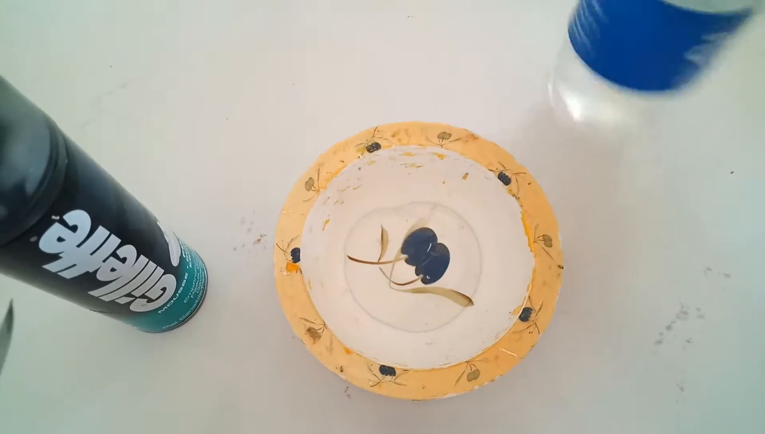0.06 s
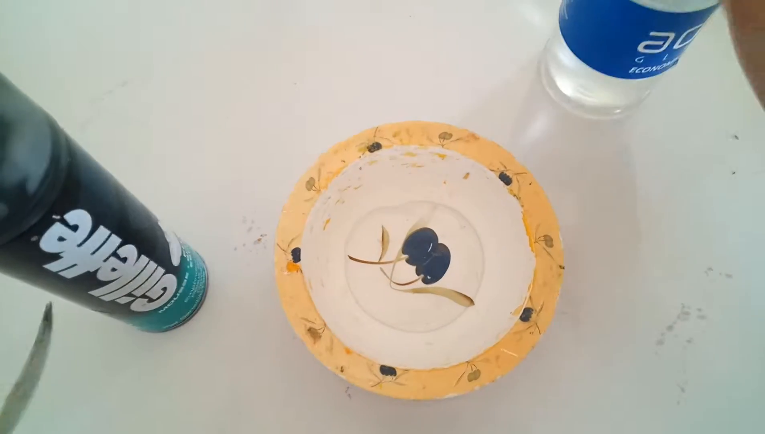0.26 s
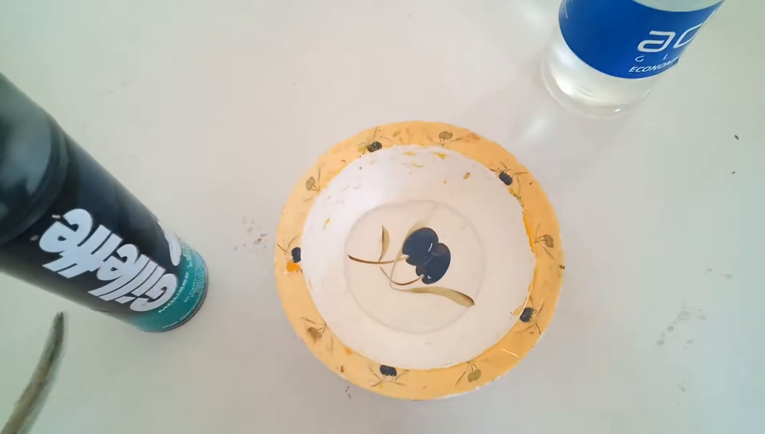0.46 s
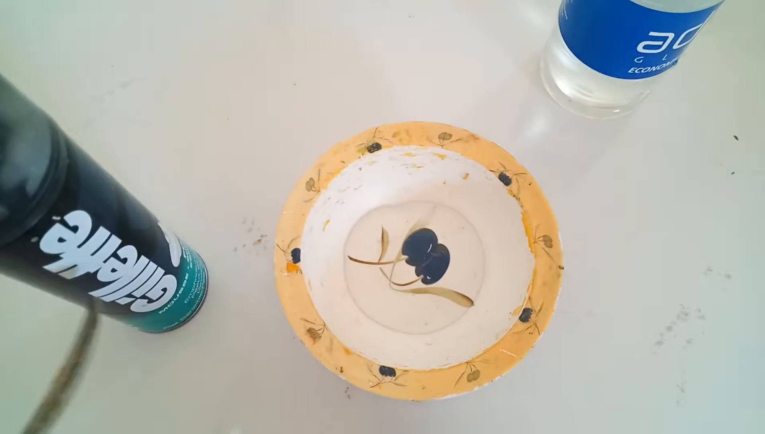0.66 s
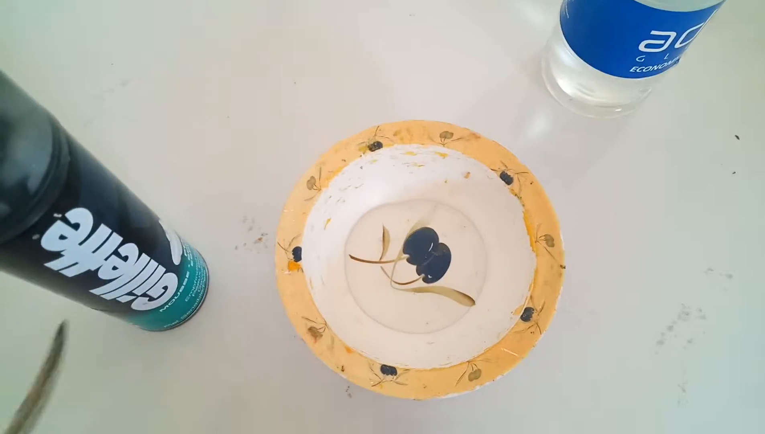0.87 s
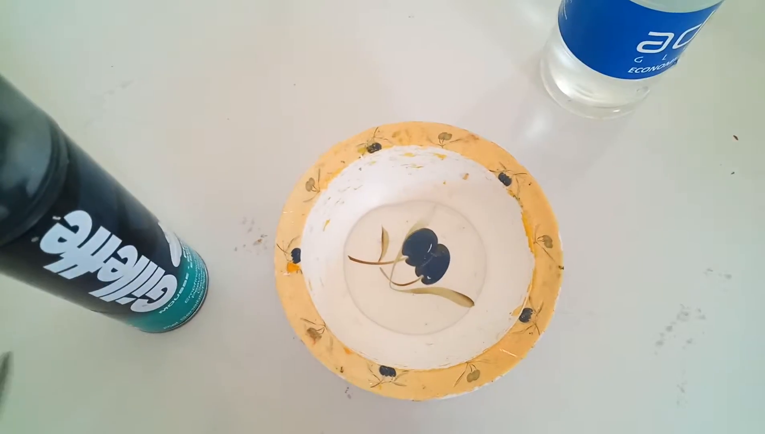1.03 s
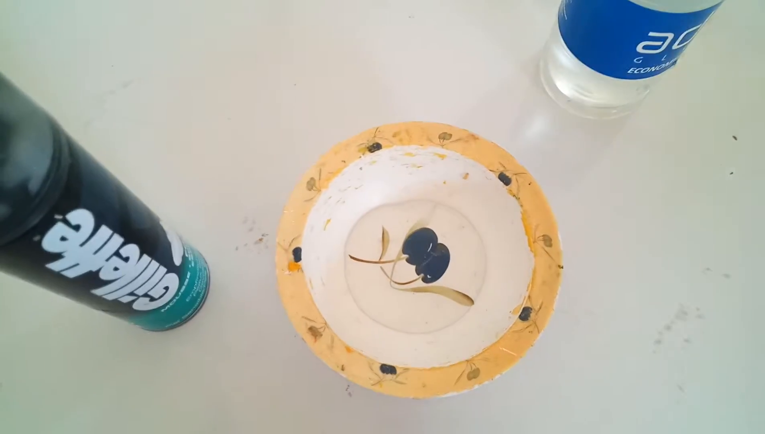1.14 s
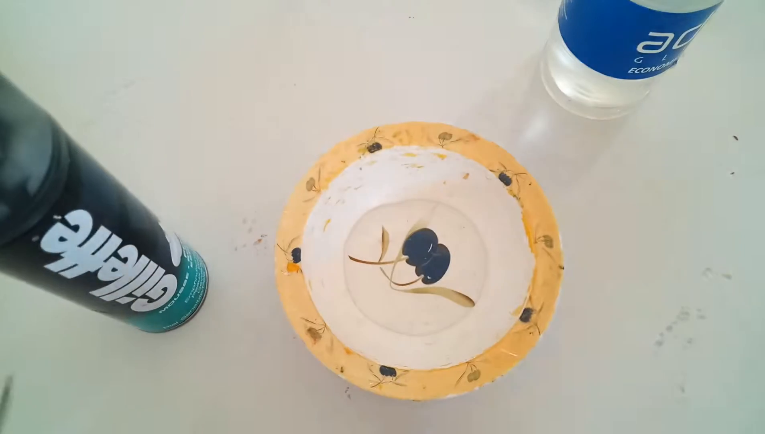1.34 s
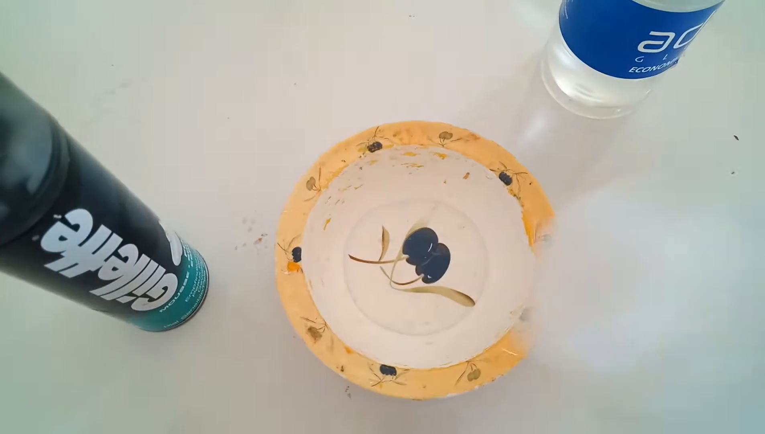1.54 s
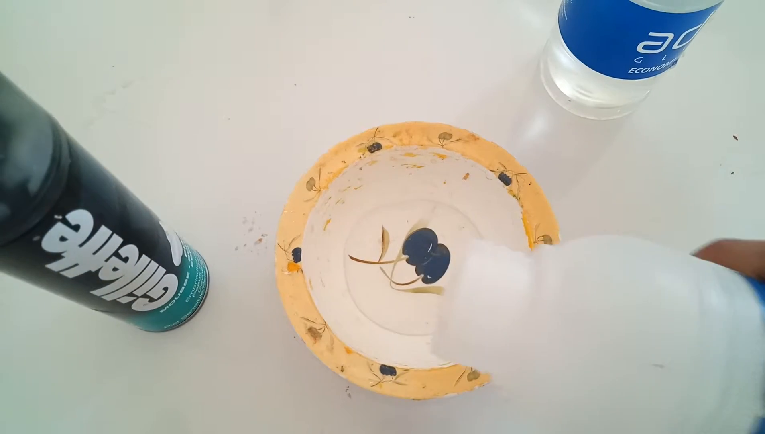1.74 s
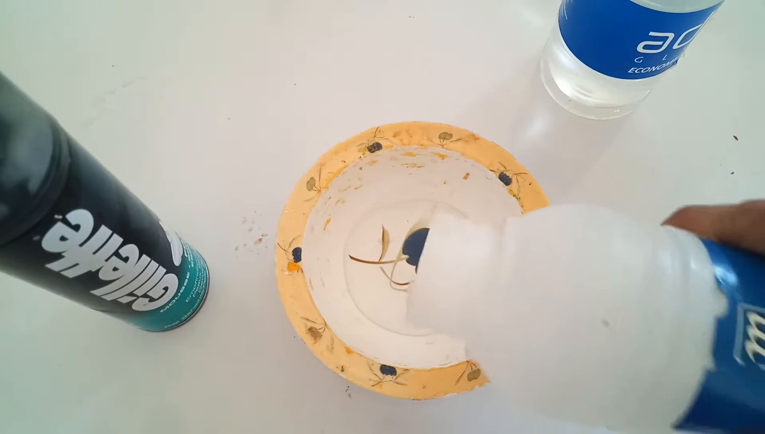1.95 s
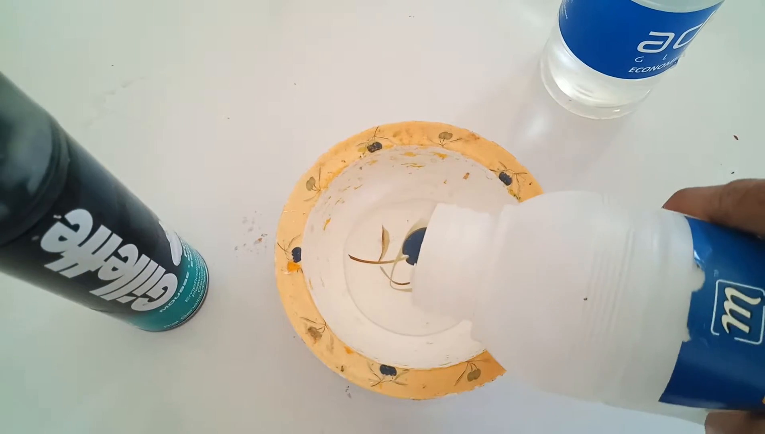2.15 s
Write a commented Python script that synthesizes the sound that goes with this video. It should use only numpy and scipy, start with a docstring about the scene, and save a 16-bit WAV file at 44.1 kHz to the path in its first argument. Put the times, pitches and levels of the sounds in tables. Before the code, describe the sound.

A plastic water bottle set down on a table with a hard, booming thud.

```python
"""A hard knock and a boom: a full plastic water bottle is set down on a table in a small, bare room.
Its base touches, lands and seats within 4 ms; bottle wall and table top ring, and the room
answers with echoes, standing waves and a tail. Soft rubs and one light tick of handling follow.
Behind them: faint thin tones, a low rumble and quiet room noise."""
import sys
import numpy as np
from scipy import signal
from scipy.fft import rfft, irfft
from scipy.io import wavfile

SR = 44100
rng = np.random.default_rng(int(sys.argv[2]) if len(sys.argv) > 2 else 0)


def put_to_file(sound):
    """Save the sound as 16-bit audio at rate SR, in the file named by the first command-line argument."""
    columns = np.atleast_2d(sound).T  # one column per channel
    safe = np.clip(columns, -1, 1)
    whole_steps = np.round(safe * 32767)
    wavfile.write(sys.argv[1], SR, whole_steps.astype(np.int16))


N = 97020
T = np.arange(N) / SR

# base touches, lands, seats: t/s, level/dB, contact time/ms
BASE_CONTACTS = [(0.2271, -20, 0.2), (0.2292, 4, 0.22), (0.2308, 6.5, 0.72)]
# resonances: f/Hz, level/dB, t60/s
BASE_MODES = [(300, -15.5, 0.017), (576, -19, 0.011), (903, -17, 0.018), (1424, -20, 0.012),
              (1744, -23, 0.022), (2916, -13, 0.015)]
WALL_MODES = [(787, -33, .26), (844, -30, .25), (900, -34, .29), (990, -31, .29), (1228, -35, .35),
              (1278, -36, .34), (1362, -34, .28), (1390, -31, .25), (1774.5, -22, .22), (1792, -29, .23),
              (2333, -39, .23), (2559, -33, .2), (2710, -32, .21), (2807, -33, .2), (4420, -39, .18),
              (10761, -42, .15)]
TABLE_MODES = [(251.7, -22, .32), (274, -22, .35), (288.5, -21, .34), (316, -36, .5), (336.5, -25, .32),
               (356, -32, .48), (411.3, -29, .39), (423, -31, .3), (467, -34, .3), (492, -36, .38),
               (510.5, -29, .38), (570, -32, .3), (591, -36, .46), (650.7, -32, .38)]
ROOM_MODES = [(68.5, -38, .7), (75, -38, .45), (95.5, -32, .52), (120.2, -22, .69), (145.2, -17.3, .64),
              (172.8, -24, .44), (197.2, -26, .45)]
TICK_MODES = [(210, 8.5, 0.19), (467, 5.5, 0.17)]
# reflections off nearby walls: delay/s, level/dB
WALL_ECHOES = [(.0045, -15), (.0115, -12), (.015, -15), (0.022, -32), (0.0243, -11.5), (.046, -23.5)]
# reverberation time: f/Hz, t60/s
TAIL_T60 = [(60, 0.76), (160, 0.85), (420, 0.65), (1100, 0.45), (2900, 0.4), (6500, 0.24), (9000, 0.21),
            (14000, .25)]
# two touches of the tick: t/s, level/dB
TICK_TOUCHES = [(0.9823, -52), (0.9867, -64.5)]
# strokes on plastic: t/s, length/s, level/dB, tilt/(dB/octave)
RUB_STROKES = [(0.473, 0.053, -64, 9), (1.076, 0.07, -70, 3), (1.124, 0.042, -66.5, 5),
               (1.449, 0.035, -62, 1), (1.465, 0.047, -53.5, -0.3), (1.574, 0.025, -64, -3.4),
               (1.876, 0.062, -80.5, -0.5)]
# thin tones: t/s, length/s, f/Hz, level/dB
THIN_TONES = [(0.707, 0.065, 1190, -65.5), (0.855, 0.14, 1182, -69), (1.881, .09, 3070, -80),
              (2.055, 0.071, 4460, -85.5)]
# noise colours: f/Hz, relative density/dB
CRACK_SPECTRUM = [(60, -25), (200, -15.5), (900, 4), (3200, 1), (4400, -2), (5400, -24.5), (7300, -13.5),
                  (10000, -19), (15000, -30)]
TAIL_SPECTRUM = [(30, -26.5), (55, -25.5), (75, -14), (130, -8.5), (300, -0.5), (550, -10.5), (720, -7),
                 (900, -5.5), (1120, -11.5), (1400, -8.5), (1750, -8), (2130, -16.5), (2800, -11),
                 (4300, -18), (5300, -29), (7000, -28.5), (10000, -45), (15000, -50.5)]
LATE_TAIL_SPECTRUM = [(40, -19), (120, -5), (400, -0.5), (1200, 1), (3800, -6), (5300, -22), (7000, -26),
                      (9000, -34), (15000, -36)]
TICK_SPECTRUM = [(150, 1), (500, 9), (1000, -7), (1900, 6), (3500, -4), (5000, -16), (7000, -15),
                 (12000, -50)]
RUB_SPECTRUM = [(40, -30), (100, -10), (500, 3.5), (1000, -11.5), (1800, -4.5), (2300, 1.5), (2700, -4),
                (3100, 4.5), (3700, 6), (4400, -13), (5500, -29), (6800, -18.5), (8000, -51),
                (15000, -44.5)]
ROOM_NOISE_SPECTRUM = [(25, -31), (50, -11), (70, -9), (120, -1), (165, 0), (210, -3.5), (300, -7.5),
                       (500, -12.5), (1000, -12.5), (1400, -16), (3200, -20), (4000, -23.5), (5200, -39),
                       (9000, -41), (15000, -41)]
# background envelopes: t/s, level/dB
RUMBLE_ENVELOPE = [(0.2, -103), (0.61, -76), (0.66, -55.5), (0.72, -53.5), (0.78, -54.5), (0.81, -89),
                   (0.89, -59), (1.0, -64.5), (1.1, -70.5), (1.55, -68.5), (1.75, -87.5)]
ROOM_NOISE_ENVELOPE = [(0, -70), (0.2, -66.5), (0.55, -61.5), (0.77, -57.5), (0.81, -62.5), (1.0, -62.5),
                       (1.3, -64), (1.55, -61.5), (1.68, -68), (2.2, -67.5)]


def bottle():
    """Base hits the table; the landing rings bottle wall, table top and room."""
    landing_s, _, contact_ms = BASE_CONTACTS[1]
    direct = base_impact()
    blow = push(landing_s, contact_ms)
    ringing = from_db(0.5) * (modes(blow, TABLE_MODES) + modes(blow, WALL_MODES))
    return direct + ringing + echoes(direct) + room_boom(landing_s) + room_tail(landing_s)


def base_impact(knock_top_hz=5190, crack_db=-19, crack_t60_s=0.014):
    """Each contact gives a dead knock of the plastic base and a noisy crack."""
    force = sum(from_db(db) * push(s, ms) for s, db, ms in BASE_CONTACTS)
    knock = signal.lfilter(*signal.butter(2, knock_top_hz, fs=SR), modes(force, BASE_MODES))
    crack = sum(from_db(crack_db + db) * decay(s, crack_t60_s) * soften(noise(CRACK_SPECTRUM), ms)
                for s, db, ms in BASE_CONTACTS)
    return knock + crack


def echoes(direct):
    """Nearby walls return delayed, weaker copies."""
    return sum(from_db(db) * np.interp(T - delay_s, T, direct, left=0) for delay_s, db in WALL_ECHOES)


def room_boom(blow_s, delay_s=0.007, swell_s=0.01, gain_db=-0.5):
    """Standing waves start late, swell together and beat as they die."""
    start_s = blow_s + delay_s
    age_s = since(start_s)
    waves = sum(from_db(gain_db + db) * np.sin(2 * np.pi * hz * age_s) * decay(start_s, t60_s)
                for hz, db, t60_s in ROOM_MODES)
    return waves * (1 - np.exp(-age_s / swell_s))


def room_tail(blow_s, build_s=0.0024, tail_db=-24, late_db=-39.5):
    """Dense reflections die at one rate per half octave, over a faint longer tail."""
    hz = np.arange(N // 2 + 1) * SR / N
    edges_hz = 22 * 2 ** np.arange(0, 10.1, 0.5)
    field = rfft(noise(TAIL_SPECTRUM))
    tail = 0
    for low, high in zip(edges_hz, edges_hz[1:]):
        band = irfft(field * ((hz >= low) & (hz < high)), N)
        tail += band * decay(blow_s, at_hz(TAIL_T60, np.sqrt(low * high)))
    late = from_db(late_db) * noise(LATE_TAIL_SPECTRUM) * decay(blow_s, t60_s=1.02)
    return (from_db(tail_db) * tail + late) * (1 - np.exp(-since(blow_s) / build_s))


def tick(snap_t60_s=0.019, room_db=-13, room_t60_s=0.22):
    """Two light, hard touches snap with a short room tail; the second rings a low body."""
    snap = sum(from_db(db) * (decay(s, snap_t60_s) + from_db(room_db) * decay(s, room_t60_s))
               for s, db in TICK_TOUCHES)
    last_s, last_db = TICK_TOUCHES[-1]
    force = from_db(last_db) * push(last_s, contact_ms=0.16)
    body = sum(from_db(db) * ring(force, hz, t60_s) for hz, db, t60_s in TICK_MODES)
    return snap * noise(TICK_SPECTRUM) + body


def rubs(slip_db=1, ring_hz=3410, ring_db=-10.5, attack_s=0.0056, release_t60_s=0.1):
    """Uneven friction on plastic, with one broad resonance."""
    slips = from_db(slip_db * wander(rate_hz=220))
    resonance = from_db(ring_db) * rms_one(ring(rng.standard_normal(N), ring_hz, t60_s=0.014))
    out = 0
    for start_s, length_s, db, tilt in RUB_STROKES:
        attack = np.minimum(since(start_s) / attack_s, 1)
        release = np.exp(-np.log(1000) * since(start_s + length_s) / release_t60_s)
        friction = noise([(hz, band_db + tilt * np.log2(hz / ring_hz)) for hz, band_db in RUB_SPECTRUM])
        out += from_db(db) * attack * release * rms_one(slips * (friction + resonance))
    return out


def thin_tones(pitch_wobble=0.0078):
    """Faint, slightly unsteady sines fade in and out."""
    warped_s = np.cumsum(1 + pitch_wobble * wander(rate_hz=150)) / SR
    out = 0
    for start_s, length_s, hz, db in THIN_TONES:
        progress = np.minimum(since(start_s) / length_s, 1)
        fade = np.sqrt(2 * np.abs(np.sin(np.pi * progress)))
        out += from_db(db) * fade * np.sin(2 * np.pi * hz * warped_s)
    return out


def rumble(centre_hz=127, stage_width_hz=22):
    """Low narrow-band noise swells and fades after the blow."""
    t60_s = np.log(1000) / (np.pi * stage_width_hz)
    band = ring(rng.standard_normal(N), centre_hz, t60_s)
    return level(RUMBLE_ENVELOPE) * rms_one(ring(band, centre_hz, t60_s))


def room_noise():
    """Quiet, dark noise of drifting level."""
    return level(ROOM_NOISE_ENVELOPE) * noise(ROOM_NOISE_SPECTRUM)


def push(start_s, contact_ms):
    """Rounded contact force of unit area."""
    age = since(start_s) / (contact_ms / 4000)   # time constant: a quarter of the contact
    pulse = age * np.exp(-age)
    return pulse / pulse.sum()


def soften(x, contact_ms):
    """Low-pass: longer contact, duller sound."""
    pole = np.exp(-4000 / (contact_ms * SR))
    return signal.lfilter([1 - pole], [1, -pole], x)


def modes(force, table):
    """Parallel resonances, alternating in sign."""
    return sum((-1) ** k * from_db(db) * ring(force, hz, t60_s)
               for k, (hz, db, t60_s) in enumerate(table))


def ring(force, hz, t60_s):
    """Resonator: a unit impulse starts a decaying unit sine."""
    radius = np.exp(-np.log(1000) / (t60_s * SR))
    angle = 2 * np.pi * hz / SR
    return signal.lfilter([0, np.sin(angle)], [1, -2 * radius * np.cos(angle), radius ** 2], force + 1e-18)


def decay(start_s, t60_s, rise_s=0.00013):
    """Fast rise, exponential fall."""
    age_s = since(start_s)
    return (1 - np.exp(-(age_s / rise_s) ** 2)) * np.exp(-np.log(1000) * age_s / t60_s)


def noise(spectrum):
    """Steady coloured noise of unit power."""
    hz = np.arange(N // 2 + 1) * SR / N
    return rms_one(irfft(rfft(rng.standard_normal(N)) * from_db(at_hz(spectrum, hz)), N))


def wander(rate_hz):
    """Random values joined by ramps."""
    return np.interp(T * rate_hz, np.arange(N), rng.standard_normal(N))


def level(envelope):
    """Gain over time from rows of t/s, level/dB."""
    return from_db(np.interp(T, *np.transpose(envelope)))


def at_hz(table, hz):
    """Table lookup on a log-frequency axis."""
    table_hz, values = np.transpose(table)
    return np.interp(np.log(np.maximum(hz, 1)), np.log(table_hz), values)


def since(start_s):
    """Elapsed seconds, zero before the start."""
    return np.maximum(T - start_s, 0)


def rms_one(x):
    """Scale to unit power."""
    return x / np.sqrt(np.mean(x ** 2) + 1e-20)


def from_db(db):
    """Decibels to gain."""
    return 10 ** (np.asarray(db) / 20)


def scene():
    """All sources, mono."""
    return (bottle() + tick() + rubs() + thin_tones() + rumble() + room_noise())[None]


def record(dry):
    """The microphone drops the deepest bass; the top is cut."""
    low_hz, high_hz = 59, 15450
    x = signal.sosfilt(signal.butter(6, low_hz, "high", fs=SR, output="sos"), dry)
    return signal.sosfilt(signal.ellip(10, 0.1, 80, high_hz, fs=SR, output="sos"), x)


dry = scene()
out = record(dry)
put_to_file(out)
```